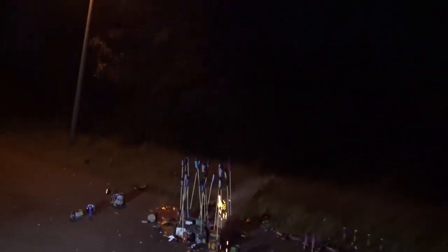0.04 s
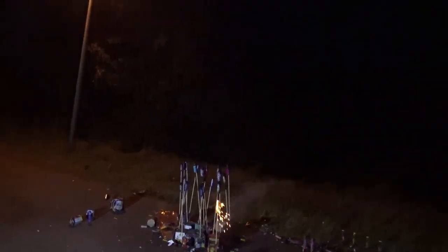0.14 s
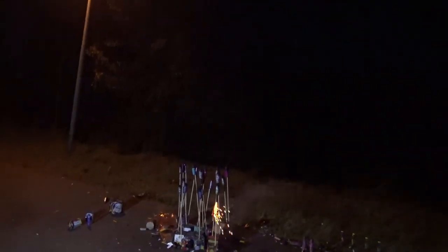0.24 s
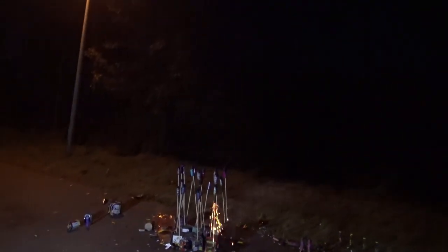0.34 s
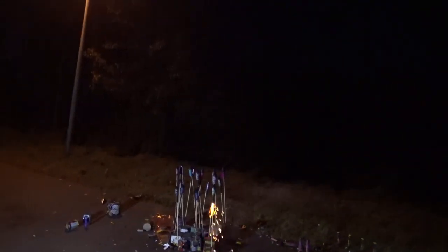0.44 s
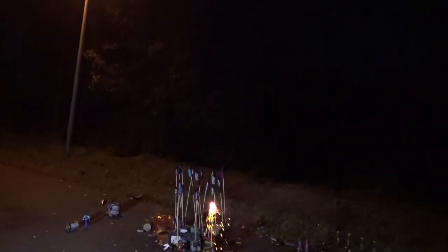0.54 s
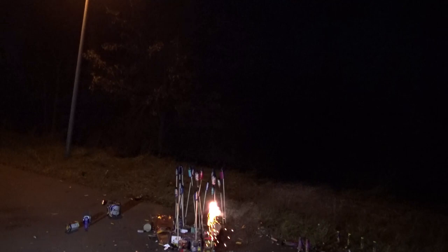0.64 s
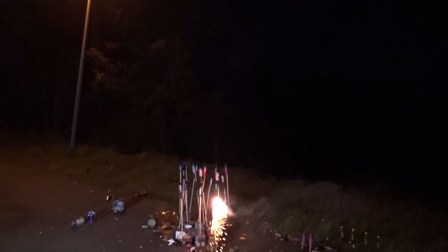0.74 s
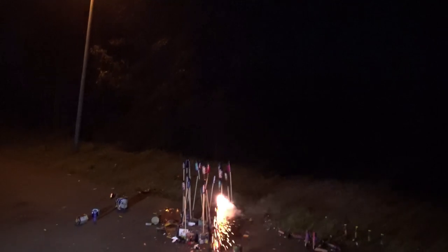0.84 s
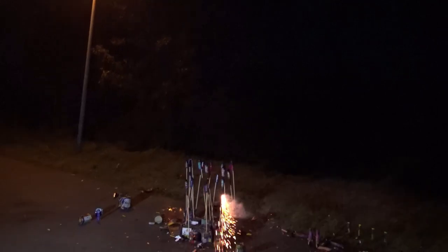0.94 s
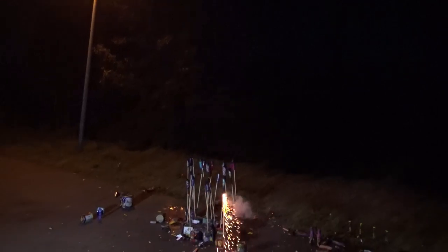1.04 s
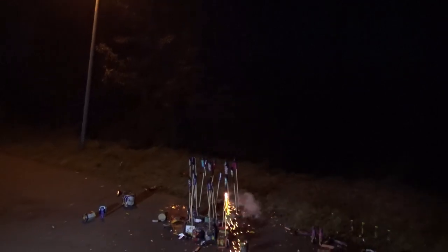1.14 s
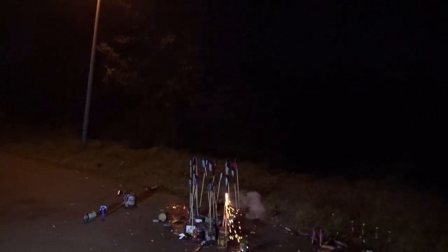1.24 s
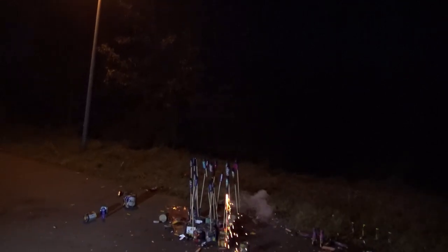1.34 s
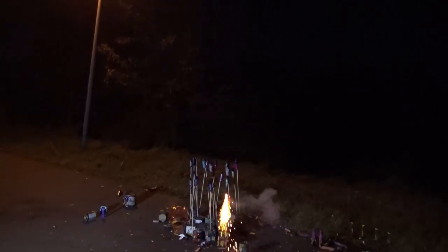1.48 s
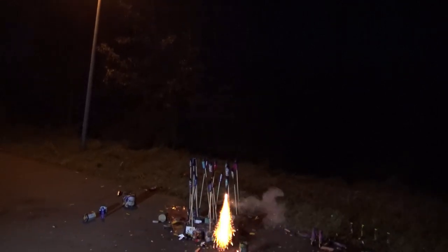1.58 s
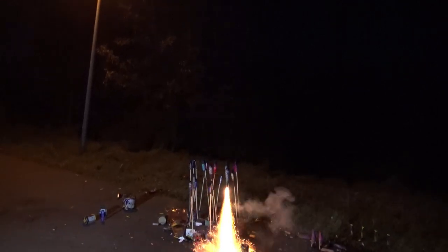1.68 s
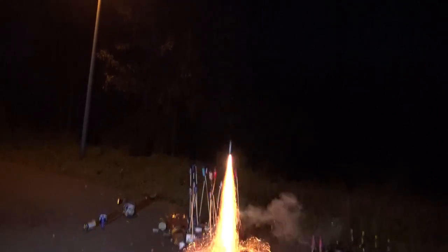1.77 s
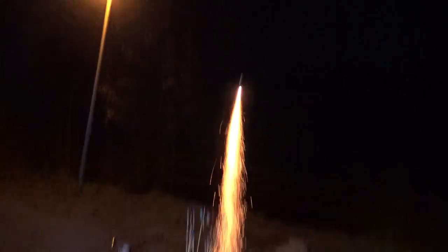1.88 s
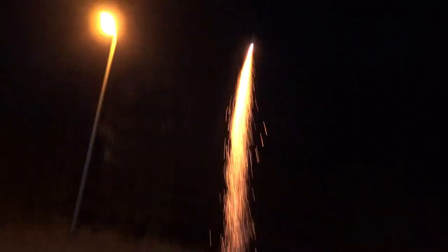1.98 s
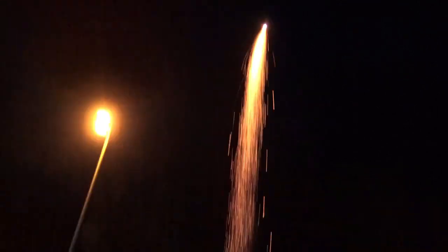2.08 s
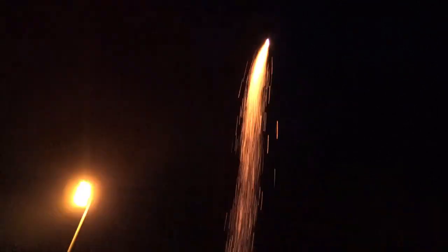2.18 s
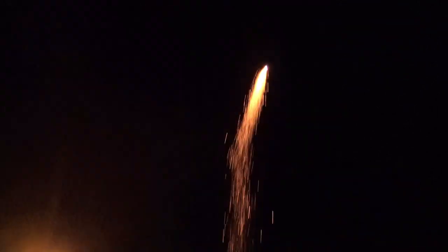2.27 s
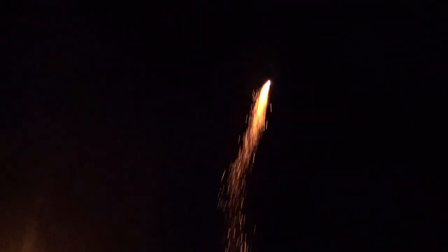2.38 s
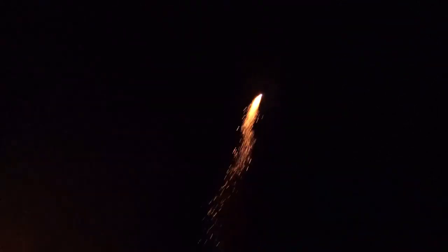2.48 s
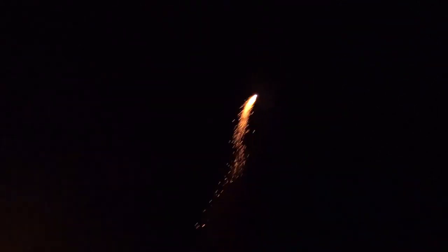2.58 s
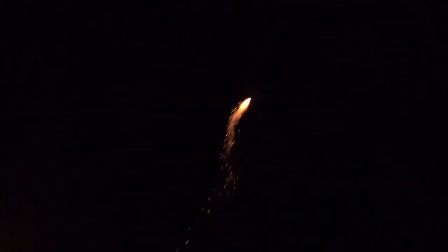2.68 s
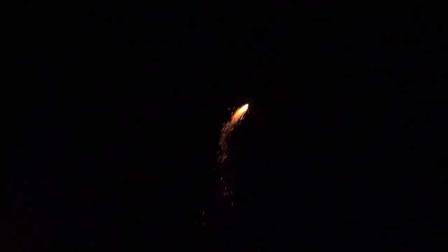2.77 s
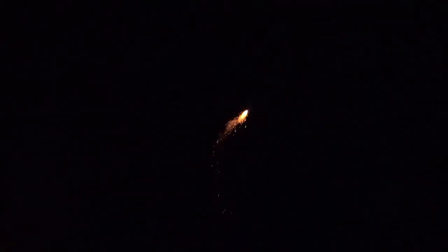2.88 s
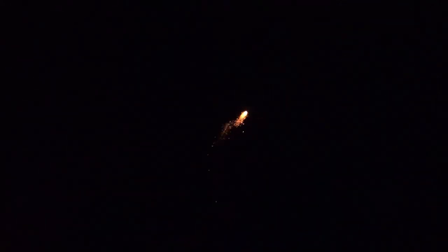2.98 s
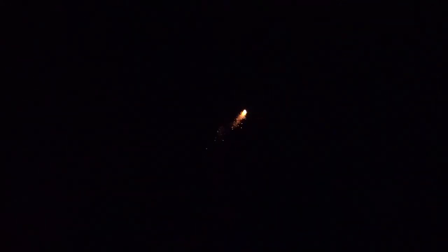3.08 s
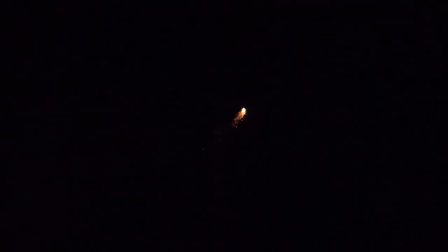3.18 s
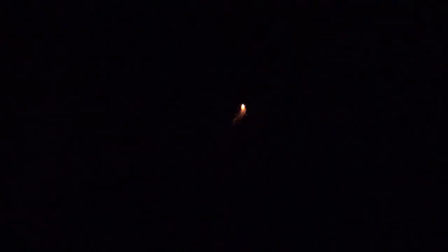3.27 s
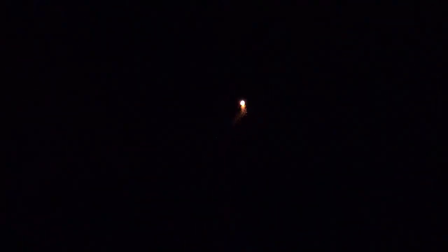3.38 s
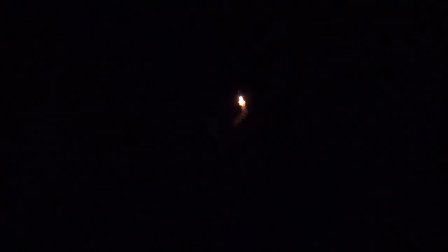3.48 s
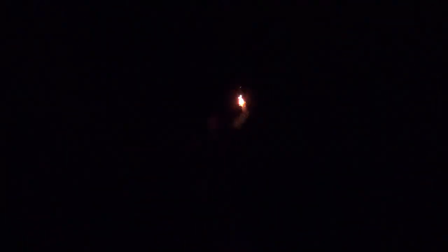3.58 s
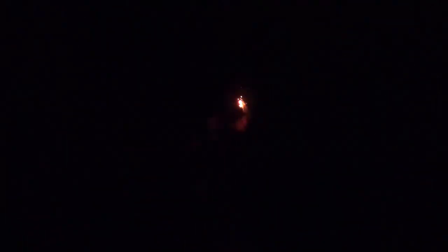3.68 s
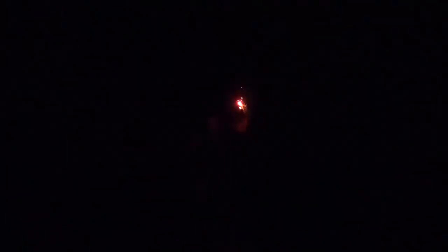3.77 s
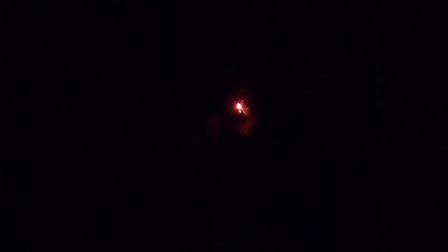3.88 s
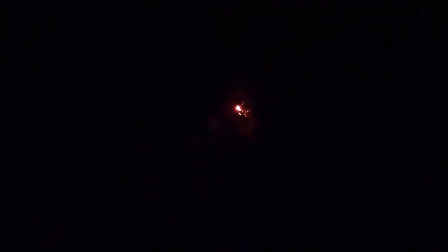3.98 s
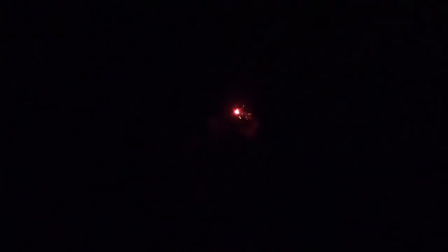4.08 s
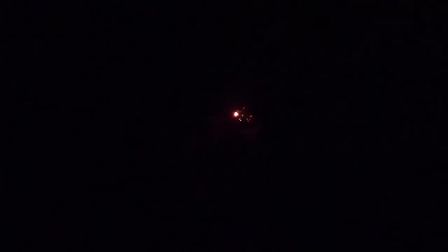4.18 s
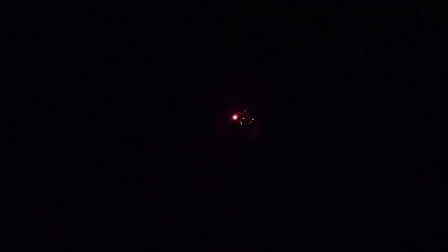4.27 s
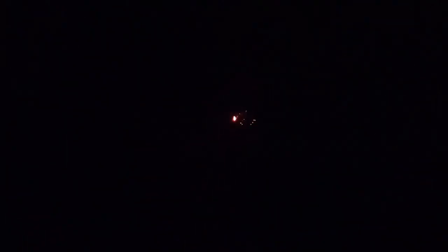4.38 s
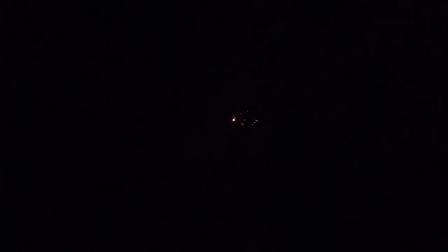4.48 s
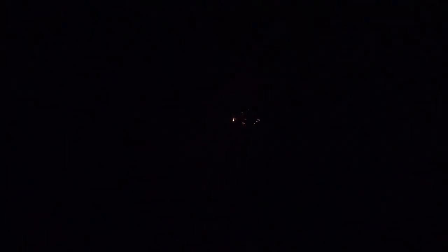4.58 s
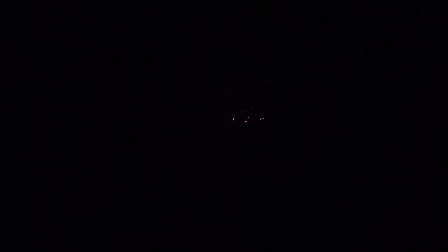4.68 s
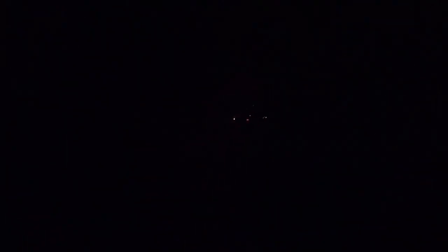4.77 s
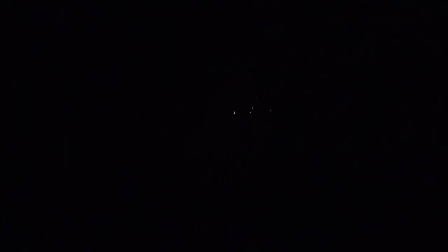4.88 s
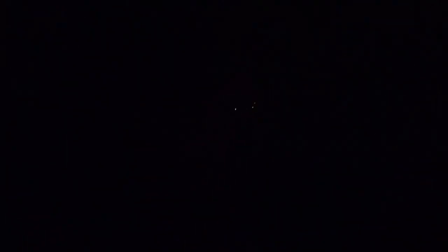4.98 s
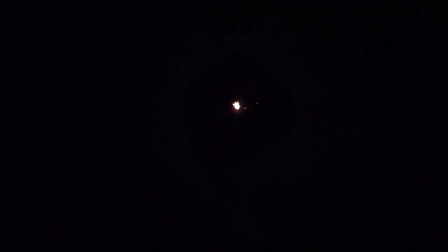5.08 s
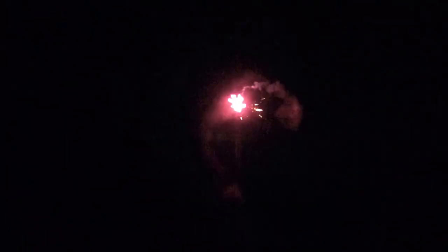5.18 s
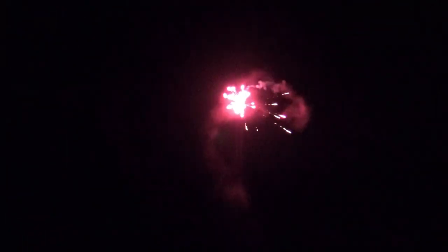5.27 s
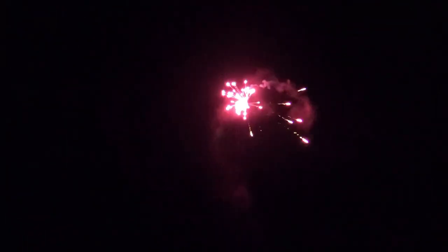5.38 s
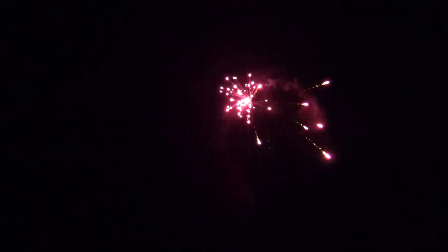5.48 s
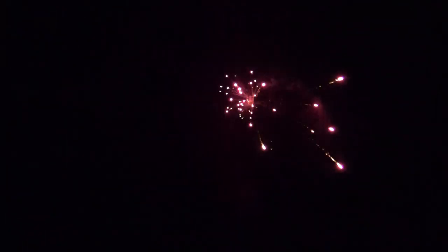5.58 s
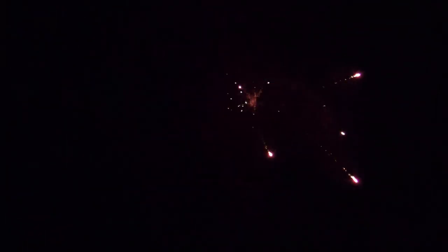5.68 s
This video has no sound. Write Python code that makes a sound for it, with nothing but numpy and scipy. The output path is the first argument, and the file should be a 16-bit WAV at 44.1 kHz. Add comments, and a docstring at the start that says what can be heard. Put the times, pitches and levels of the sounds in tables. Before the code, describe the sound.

Outdoors at night, fizzing sparks give way to a fierce rocket whoosh deepening to a roar, an echoing pop, a quiet gap, then a bang.

```python
"""A firework rocket at night, a few metres from the microphone. First the fuse fizzes and spits: noise in
throbbing spurts, snaps and grainy sparks. The motor catches and climbs, its hiss deepening to a roar,
combed by the ground reflection. It burns out with a pop and later bursts high up: two shock fronts,
thrown back by walls as slaps and by trees as washes of noise. Throughout, night air and wind lie
beneath, and a gain control holds the loud rocket near one level. All source levels are set before it."""
import sys
import numpy as np
from scipy import signal
from scipy.fft import rfft, irfft
from scipy.io import wavfile
from scipy.ndimage import uniform_filter1d, map_coordinates

SR = 44100
rng = np.random.default_rng(int(sys.argv[2]) if len(sys.argv) > 2 else 0)


def inscribe(sig):
    """Save sig as 16-bit PCM at rate SR to the path in sys.argv[1].

    A 1-D sig is mono; a 2-D sig holds one channel per row.
    Samples are clipped to [-1, 1] before scaling.
    """
    pcm = np.round(np.clip(np.atleast_2d(sig).T, -1, 1) * 32767)
    wavfile.write(sys.argv[1], SR, pcm.astype(np.int16))


N = 252858
TIME = np.arange(N) / SR
FRAME_S = np.arange(N // 256 + 5) * 256 / SR  # one noise colour every 256 samples
BIN_HZ = np.fft.rfftfreq(1024, 1 / SR)


def amp(db):
    """Decibels to gain."""
    return 10 ** (np.asarray(db) / 20)


def unit(x):
    """Scale to rms 1."""
    return x / np.sqrt(np.mean(x ** 2) + 1e-20)


def at_hz(points, hz):
    """Read a spectrum on a log-frequency axis."""
    f, value = np.transpose(points)
    return np.interp(np.log(hz + 1), np.log(f + 1), value)


def at_time(rows, t):
    """Read every column of a curve at the times t."""
    s, *columns = np.transpose(rows)
    return [np.interp(t, s, column) for column in columns]


def add(mix, s, sound):
    """Mix a stereo sound in at time s."""
    part = mix[:, round(s * SR):][:, :sound.shape[1]]
    part += sound[:, :part.shape[1]]


def pan(db):
    """Left and right gains for a level difference; positive leans left."""
    return amp([[db / 2], [-db / 2]])


def lowpass(x, hz, order=2):
    """Causal low-pass."""
    return signal.sosfilt(signal.butter(order, min(hz, SR / 2 - 1), fs=SR, output="sos"), x)


def highpass(x, hz, order=1):
    """Causal high-pass."""
    return signal.sosfilt(signal.butter(order, hz, "high", fs=SR, output="sos"), x)


def delayed(x, lag_ms):
    """Delay a sound by a lag that changes with time."""
    return map_coordinates(x, [np.arange(N) - lag_ms * SR / 1000], order=5)


def swell(start, length, edge):
    """Rise, hold and fall, with rounded edges."""
    inside = np.minimum(TIME - start, start + length - TIME)
    return np.sin(np.pi / 2 * np.clip(inside / edge + .5, 0, 1)) ** 2


def flutter(rate_hz, depth_db):
    """A random gain of rms 1 whose wavering weakens above the given rate."""
    hz = np.fft.rfftfreq(N, 1 / SR)
    waver = irfft(rfft(rng.standard_normal(N)) / (1 + (hz / rate_hz) ** 2), N)
    return unit(amp(depth_db * unit(waver)))


def noise(colour_db, same, patchy_db):
    """Stereo noise of rms 1 whose colour may change from frame to frame, with drifting patches."""
    a, b, c, d, patches = rng.standard_normal((5, len(FRAME_S), len(BIN_HZ)))
    patches = uniform_filter1d(patches, size=7, axis=0)  # smooth over time
    patches = unit(uniform_filter1d(patches, size=12, axis=1))  # smooth over pitch
    size = amp(colour_db + patchy_db * patches)
    size = size / np.linalg.norm(size, axis=1, keepdims=True)
    alike = np.clip(at_hz(same, BIN_HZ), -1, 1)
    left = a + 1j * b
    right = alike * left + np.sqrt(1 - alike ** 2) * (c + 1j * d)
    bins = size * np.array([left, right])
    return unit(signal.istft(bins.transpose(0, 2, 1), nperseg=1024, noverlap=768)[1][:, :N])


def coloured(x, colour):
    """Give a sound a fixed spectrum, at rms 1."""
    return unit(irfft(rfft(x) * amp(at_hz(colour, np.fft.rfftfreq(N, 1 / SR))), N))


def grains(per_s, spread_db):
    """Random clicks of uneven size, each with its own left-right balance."""
    size = amp(spread_db * np.minimum(rng.exponential(1, N), 4)) * rng.choice([-1, 1], N)
    side = rng.uniform(-1.2, 1, N) / 2
    return size * (rng.random(N) < per_s / SR) * np.array([1 + side, 1 - side])


def blast(push_ms):
    """A shock front: a sudden push, then a longer, weaker suction."""
    u = np.arange(2048) * 1000 / SR / push_ms
    return (1 - u) * np.exp(-u)


# Spectra of the outdoor wash and the wind. Each row: frequency in Hz, level in dB.
AIR_COLOUR = [(30, -4.5), (150, 2.5), (330, 0.5), (450, -1.5), (620, 0.5), (850, -2), (1200, -1.5),
              (1900, -3), (2600, -13), (4000, -20), (9000, -17.5), (16000, -21.5)]
WIND_COLOUR = [(8, -5.5), (20, -2.5), (35, 0.5), (55, -8.5), (90, -13), (150, -26), (400, -51.5),
               (2000, -82.5)]
# Stereo width of the outdoor wash. Each row: frequency in Hz, left-right likeness from 0 to 1.
AIR_SAME = [(60, .6), (300, 0.78), (1500, 0.77), (3500, 0.92), (7000, .2), (15000, .1)]
# Gusts on the microphone. Each row: centre in seconds, half width in seconds, peak level in dB.
GUSTS = [(.1, 0.065, -24), (.8, .15, -29), (3.0, 0.56, -22), (3.75, 0.24, -19), (4.9, 0.61, -21)]
AIR_DB, BREEZE_DB = -29, -31  # before panning


def night():
    """A steady, distant wash of outdoor noise, and wind buffeting each microphone port."""
    air = amp(AIR_DB) * noise(at_hz(AIR_COLOUR, BIN_HZ), AIR_SAME, patchy_db=1.5) * pan(3.1)
    gusts = sum(amp(db) ** 2 * np.exp(-((TIME - s) / width) ** 2) for s, width, db in GUSTS)
    wind = np.sqrt(amp(BREEZE_DB) ** 2 + gusts)
    shared = 0.65 * rng.standard_normal(N)
    buffets = coloured(rng.standard_normal((2, N)) + shared, WIND_COLOUR)
    return air + wind * buffets * pan(-5)


# Spectra of the tree echoes at their start, before the treble tilt. Each row: frequency in Hz, level in dB.
JET_ECHO_COLOUR = [(50, -35), (110, -15), (230, -8.5), (500, -7.5), (1100, -3.5), (1900, -7.5),
                   (3500, -11.5), (6000, -14.5), (9000, -20), (15500, -38)]
BURST_ECHO_COLOUR = [(30, -40), (60, -16), (115, -10), (160, -1.5), (240, -3.5), (400, 0), (650, -0.5),
                     (1000, -4), (1300, -12), (2000, -10), (2800, -14), (4500, -21), (8000, -26),
                     (11000, -36.5), (15500, -47)]
# Stereo width of the echoes. Each row: frequency in Hz, left-right likeness from 0 to 1.
ECHO_SAME = [(60, 0.69), (250, 0.2), (1000, 0.41), (3000, 0.36), (7000, 0.063), (15000, .05)]
# Echoes rolling back from the trees. Each row: start in seconds, level in dB before rise and decay,
# rise in seconds, age in seconds at which the slow decay has halved the sound, extra fade in dB per second
# (negative slows the decay), treble lift in dB at 8 kHz, treble loss in dB at 8 kHz after one second.
ECHOES = [(3.49, 9, 0.053, 0.074, 9.5, 8, 47.5), (5.275, 2, 0.064, 0.84, -3.5, 12, 40.5)]
LOSS_GROWTH = 0.69  # the treble loss grows with this power of time


def tree_echo(echo, colour, lumpy_db):
    """Countless small reflections; later ones came farther, so they are weaker and have lost more treble."""
    start, db, rise_s, halving_s, fade_db_per_s, treble_db, loss_db = echo
    age = np.maximum(TIME - start, 0)
    frame_age = np.maximum(FRAME_S - start, 0)[:, None]
    tilt_db = (treble_db - loss_db * frame_age ** LOSS_GROWTH) * (BIN_HZ / 8000) ** 1.14
    wash = noise(at_hz(colour, BIN_HZ) + tilt_db, ECHO_SAME, patchy_db=1.13)
    rise = np.minimum(age / rise_s, 1) ** 1.66
    level = rise * amp(db - fade_db_per_s * age) / (1 + age / halving_s)
    return level * wash * flutter(rate_hz=45, depth_db=lumpy_db)


# Slaps off nearby walls. Each row: start in seconds, peak in dB before panning, push in milliseconds,
# left-right level difference in dB.
SLAPS = [(3.5254, 14, 0.25, -12), (3.5305, 18.5, 0.19, -4), (3.588, 8.5, 0.53, 13), (3.63, 5, 1.1, 3),
         (3.855, 14, 0.33, -8.5), (3.937, 14, .22, -13), (3.995, -4, 0.27, -3), (4.135, -0.5, 0.25, 3),
         (4.174, 6, 0.36, -12.5), (4.248, -8, .25, 5), (4.262, -9, .42, 2), (4.386, -6.5, 0.5, 2),
         (5.482, 8, 0.94, 5), (5.593, 11, 0.91, -7), (5.6, 7, 0.96, -10.5), (5.6622, 7, 0.79, -19),
         (5.712, 12, 0.63, -2)]


def slaps(scatter=0.13, scatter_s=0.0042):
    """A wall returns a rounded copy of the shock, with a short scatter from its edges."""
    out, t = np.zeros((2, N)), np.arange(2048) / SR
    all_edges = rng.standard_normal((len(SLAPS), 2, len(t)))
    for (s, db, push_ms, side_db), edges in zip(SLAPS, all_edges):
        wall = (t == 0) + scatter * edges * np.exp(-t / scatter_s)
        slap = signal.fftconvolve(wall, blast(push_ms)[None], axes=1)
        slap = lowpass(slap, 700 / push_ms, order=2)  # a longer push has a rounder front
        slap = highpass(slap, 320)
        add(out, s, amp(db) * pan(side_db) * slap / abs(slap).max())
    return out


# Soft, hollow thumps. Each row: start in seconds, envelope peak in dB before panning, pitch in Hz,
# ring in seconds.
THUMPS = [(.15, -17.5, 340, 0.0049), (3.789, -6.5, 130, 0.003), (5.223, -7, 338, .002),
          (5.2302, -8, 390, .002)]


def thumps():
    """Short, heavily damped low notes with a soft start."""
    out, t = np.zeros((2, N)), np.arange(4096) / SR
    for s, db, hz, ring_s in THUMPS:
        envelope = t / ring_s * np.exp(1 - t / ring_s)
        add(out, s, pan(-1) * amp(db) * envelope * np.sin(2 * np.pi * hz * t))
    return out


# The burnout pop and the burst. Each row: start in seconds, shock pressure in dB before filtering,
# push in milliseconds, ground lag in milliseconds, ground reflection in dB before its own filters.
REPORTS = [(3.4937, 33, 0.42, 12.2, -3.5), (5.274, 38, 0.35, 11.75, -12.5)]


def reports(rasp=0.076, rasp_s=0.002, grass_hz=3200):
    """Each shock arrives directly with a ragged wake, then again, duller, off the grass."""
    out, t = np.zeros((2, N)), np.arange(2048) / SR
    wakes = rng.standard_normal((len(REPORTS), 2, len(t)))
    for (s, db, push_ms, lag_ms, ground_db), wake in zip(REPORTS, wakes):
        shock = pan(0) * amp(db) * blast(push_ms)
        wake = amp(db) * rasp * lowpass(wake, 3000, order=1) * np.exp(-t / rasp_s)
        add(out, s, lowpass(shock, 5300, order=1) + wake)
        grass = lowpass(highpass(shock, 180), grass_hz, order=2)
        add(out, s + lag_ms / 1000, amp(ground_db) * grass)
    return highpass(out, 144, order=2)


# How the flame creeps along the fuse. Each row: time in seconds, height above the nozzle in metres.
FUSE_CREEP = [(.35, .017), (.75, 0)]
LIFTOFF_S, PUSH_M_PER_S2, TOP_M_PER_S, PAD_HEIGHT_M = 1.692, 50.4, 25.3, .699


def height(t):
    """Height of the flame in m: the rocket speeds up until drag matches its push."""
    gather_s = TOP_M_PER_S / PUSH_M_PER_S2
    flown = TOP_M_PER_S * gather_s * np.log(np.cosh(np.maximum(t - LIFTOFF_S, 0) / gather_s))
    return PAD_HEIGHT_M + at_time(FUSE_CREEP, t)[0] + flown


MIC_HEIGHT_M, PAD_DISTANCE_M, SOUND_M_PER_S = 2.112, 5, 343


def path(height_m):
    """Distance in m from a point above the pad to the microphone."""
    return np.hypot(PAD_DISTANCE_M, height_m - MIC_HEIGHT_M)


GROUND_PAD_DB, GROUND_DB_PER_DECADE = -5, -9.5  # the reflection weakens with each tenfold height


def ground(x):
    """Add the reflection off the ground: a comb that sweeps down as the source rises."""
    h = height(TIME)
    lag_ms = 1000 * (path(-h) - path(h)) / SOUND_M_PER_S  # the mirror image lies below ground
    strength = amp(GROUND_PAD_DB + GROUND_DB_PER_DECADE * np.log10(h / PAD_HEIGHT_M))
    mirror = np.array([delayed(side, lag_ms) for side in x])
    return (x + strength * mirror) / np.sqrt(1 + strength ** 2)


SWING_S, SWING_WIDTH_S, SWING_LAG_MS = 1.844, .13, .028  # the microphone swings up after the rocket


def ports(x):
    """While the microphone swings, the sound reaches its two ports a little out of step."""
    lag_ms = SWING_LAG_MS * np.exp(-((TIME - SWING_S) / SWING_WIDTH_S) ** 2)
    return np.array([delayed(x[0], -lag_ms / 2), delayed(x[1], lag_ms / 2)])


# The fuse burns in spurts. Each row: start in seconds, length in seconds, swell and fade in seconds,
# flame hiss in dB, flare in dB before a 3 dB lift, spark fizz in dB, low roar in dB, throb depth in dB.
SPURTS = [(-.03, 0.17, 0.075, -28.5, -25.5, -49, -28.5, 2.5),
          (0.119, 0.11, 0.042, -23.5, -27, -35, -25.5, 2.5), (.2, 0.11, 0.035, -23.5, -27.5, -36, -40, 2),
          (0.231, 0.16, 0.14, -23, -31.5, -38.5, -40, -1), (0.483, 0.64, 0.046, -36, -42, -40, -39, 0),
          (0.65, 0.39, 0.26, -47, -56, -31, -30, 0.5), (1.047, 0.13, 0.089, -33, -29.5, -36, -29, -0.5),
          (1.16, 0.17, .08, -36, -38.5, -36, -31, 0), (1.393, 0.082, 0.096, -32, -34, -40, -30, 0)]
# The smoulder between spurts: flame, flare (before its 3 dB lift), fizz and low roar in dB.
SMOULDER_DB = (-34.5, -42, -44.5, -42)
THROB_HZ, FUSE_OUT_S = 20, 1.52


def burn_levels():
    """Gains of flame, flare, fizz and low roar: throbbing spurts over a steady smoulder."""
    power = amp(SMOULDER_DB)[:, None] ** 2
    for start, length, edge, *layers_db, throb_db in SPURTS:
        throb = amp(throb_db * np.sin(2 * np.pi * THROB_HZ * TIME))
        power = power + (amp(layers_db)[:, None] * swell(start, length, edge) * throb) ** 2
    return np.sqrt(power) * np.clip((FUSE_OUT_S - TIME) / 0.025, 0, 1)


# Spectra of flame hiss, burning flares, spark fizz and low roar. Each row: frequency in Hz, level in dB.
FLAME = [(1500, -37.5), (3000, -19.5), (5000, -11), (6400, 2), (7200, 3.5), (8300, -1), (9500, -17),
         (11000, -23), (16000, -33)]
FLARE = [(100, -23), (360, 6.5), (620, -8), (1100, 0.5), (1900, 2), (3000, -0.5), (5500, -0.5), (7500, -3),
         (10000, -24), (16000, -33)]
FIZZ = [(2000, -21.5), (6000, -10), (9000, 8.5), (11000, -3), (13500, -3), (16000, -12.5)]
LOW_ROAR = [(60, -7), (160, 2), (300, 0), (450, -1.5), (620, 1), (850, -6.5), (1300, -7), (3000, -27.5),
            (8000, -46)]
# Stereo width of the flame. Each row: frequency in Hz, left-right likeness from 0 to 1.
FUSE_SAME = [(100, 0.99), (1400, 0.83), (3000, 0.93), (7000, 0.78), (15000, .74)]
# Sparks that snap off the fuse. Each row: start in seconds, peak in dB before panning and ground.
SPARKS = [(0.243, -3), (.292, -8), (0.34, -8), (.3418, -11), (.3442, -14), (0.366, -3.5), (0.488, -12),
          (1.0, -11), (1.275, -19), (1.451, -21)]


def fuse():
    """A sputtering flame, flares of burning powder and loud snaps; apart from them, the fizz of flying sparks."""
    flame, flare, fizz, roar = burn_levels() * flutter(rate_hz=59, depth_db=1.15)
    out = flame * noise(at_hz(FLAME, BIN_HZ), FUSE_SAME, patchy_db=1.0)
    out += flare * noise(at_hz(FLARE, BIN_HZ), FUSE_SAME, patchy_db=2.5) * amp(3.0)
    out += roar * noise(at_hz(LOW_ROAR, BIN_HZ), AIR_SAME, patchy_db=2.0)
    t = np.arange(256) / SR
    snaps = rng.standard_normal((len(SPARKS), len(t) + 1))
    for (s, db), snap in zip(SPARKS, snaps):
        snap = lowpass(np.diff(snap) * np.exp(-t / 0.00026), 9000, order=1)
        add(out, s, pan(0) * amp(db) * snap / abs(snap).max())
    return out, fizz * coloured(grains(per_s=3400, spread_db=-2.0), FIZZ)


# Spectrum of the flame on the ground. Each row: frequency in Hz, level in dB.
SCOUR_COLOUR = [(150, -31), (400, -14), (1000, -11), (2200, -7.5), (3600, 2.5), (5200, 5), (7000, -14),
                (16000, -24)]
SCOUR_S, SCOUR_DB = 1.82, 20  # the peak, before the ground reflection
SCOUR_RISE_DB_PER_S, SCOUR_FALL_DB_PER_S = 307.5, 260


def scour():
    """The flame sweeps the ground for a moment: a deeper rush under the hiss."""
    age = TIME - SCOUR_S
    level = amp(SCOUR_DB + np.minimum(SCOUR_RISE_DB_PER_S * age, -SCOUR_FALL_DB_PER_S * age))
    return level * noise(at_hz(SCOUR_COLOUR, BIN_HZ), FUSE_SAME, patchy_db=5.5)


# Exhaust spectra on the pad, from the side in flight, and along the axis overhead.
# Each row: frequency in Hz, level in dB.
JET_PAD = [(100, -36), (300, -26.5), (600, -18), (1300, -15), (3000, -13), (4500, -11), (6000, -4),
           (7000, 1.5), (8300, 1), (9500, -4), (11000, -10.5), (13500, -13), (16000, -22)]
JET_SIDE = [(100, -41.5), (200, -28.5), (350, -22.5), (650, -16.5), (1300, -10), (2500, -6), (4800, -4),
            (7000, 0.5), (8500, 0), (11500, -5), (13000, -4.5), (16000, -9.5)]
JET_OVERHEAD = [(30, -49.5), (70, -31.5), (130, -17.5), (220, -13.5), (420, -8), (900, -3), (1500, -0.5),
                (2500, 0.5), (4200, -4.5), (6500, -5.5), (8300, -7), (11300, -15.5), (13000, -17.5),
                (16000, -26.5)]
# Stereo width of the exhaust. Each row: frequency in Hz, left-right likeness from 0 to 1.
JET_SAME = [(100, 0.94), (600, 0.96), (2000, 0.99), (4000, 0.94), (7000, 0.85), (15000, 0.66)]
# The motor catches and builds up. Each row: time in seconds, level in dB at the distance of the pad.
THRUST = [(1.45, -72), (1.472, -26.5), (1.495, -11.5), (1.52, -1), (1.58, 9.5), (1.74, 24), (1.9, 20.5),
          (2.1, 18.5), (2.55, 26.5), (2.63, 25.5), (3.0, 25.5), (3.23, 27), (3.42, 26)]
STUTTER_S, STUTTER_LENGTH_S, STUTTER_DB, BURNOUT_S = 3.445, .032, -6.5, 3.495
CLEAR_M = .12  # the hiss opens up as the nozzle clears the pad
BEAM_DEG, BEAM_SHARE = 41.7, 0.85  # half width of the roar along the axis, and its share of the colour there
# The rocket tips so that its exhaust points at the microphone.
AIM_S, AIM_WIDTH_S, AIM_DEEPENING = 3.253, 0.14, 0.28


def jet():
    """The exhaust hisses to the side and roars along its axis, so it deepens as the rocket goes overhead."""
    h = height(FRAME_S)[:, None]
    clear = 1 - np.exp(-(h - PAD_HEIGHT_M) / CLEAR_M)
    off_axis_deg = np.degrees(np.arctan2(PAD_DISTANCE_M, h - MIC_HEIGHT_M))
    aim = AIM_DEEPENING * np.exp(-((FRAME_S[:, None] - AIM_S) / AIM_WIDTH_S) ** 2)
    overhead = np.exp(-(off_axis_deg / BEAM_DEG) ** 2) * BEAM_SHARE + aim
    side_db = (1 - clear) * at_hz(JET_PAD, BIN_HZ) + clear * at_hz(JET_SIDE, BIN_HZ)
    colour_db = (1 - overhead) * side_db + overhead * at_hz(JET_OVERHEAD, BIN_HZ)
    stutter_db = STUTTER_DB * swell(STUTTER_S, STUTTER_LENGTH_S, edge=0.0062)
    thrust = amp(at_time(THRUST, TIME)[0] + stutter_db)
    burning = (TIME > THRUST[0][0]) * (TIME < BURNOUT_S)
    level = thrust * PAD_DISTANCE_M / path(height(TIME)) * burning  # weaker with distance
    return level * noise(colour_db, JET_SAME, patchy_db=0.86) * flutter(rate_hz=110, depth_db=0.23)


def scene():
    """Fuse and motor over the ground, the reports, their echoes, thumps and the night air."""
    flame, fizz = fuse()
    rocket = ports(ground(flame * pan(.5) + jet() + scour())) + fizz
    roar_echo = tree_echo(ECHOES[0], JET_ECHO_COLOUR, lumpy_db=1.0) * pan(-0.11)
    burst_echo = tree_echo(ECHOES[1], BURST_ECHO_COLOUR, lumpy_db=1.43) * pan(0.92)
    return night() + roar_echo + burst_echo + slaps() + thumps() + reports() + rocket


# Gain control: quick to duck, slow to creep back, keener on treble.
CEILING_DB, DETECT_S, RECOVER_PER_S = -11.5, 0.0063, 0.059  # recovery is in linear gain per second
TREBLE_BIAS, BIAS_HZ = 1.015, 7000


def auto_gain(x):
    """Gain that holds loud sound at a ceiling and then creeps back; a brief shock slips through."""
    power = (x ** 2 + (TREBLE_BIAS * highpass(x, BIAS_HZ)) ** 2).mean(0)
    level_db = 10 * np.log10(abs(uniform_filter1d(power, size=64)) + 1e-12)
    keep = np.exp(-1 / (DETECT_S * SR))
    excess_db = signal.lfilter([1 - keep], [1, -keep], level_db - CEILING_DB)
    creep = RECOVER_PER_S * TIME
    # the running minimum remembers each duck; the creep added back lets the gain recover
    return np.minimum.accumulate(amp(-np.maximum(excess_db, 0)) - creep) + creep


EDGE_HZ = 15900  # upper band limit


def record(dry):
    """Gain control ducks everything under the rocket, the shocks overload the input; then the band limit."""
    clipped = np.clip(dry * auto_gain(dry), -.95, .95)
    band = signal.firwin(511, EDGE_HZ, window=("kaiser", 9), fs=SR)
    return signal.oaconvolve(clipped, band[None], "same")


dry = scene()
out = record(dry)
inscribe(out)
```